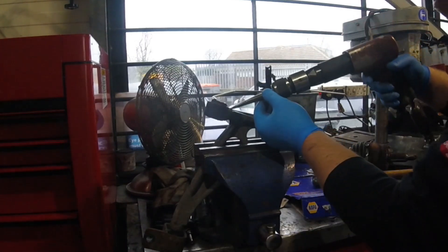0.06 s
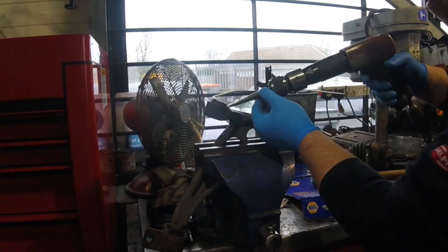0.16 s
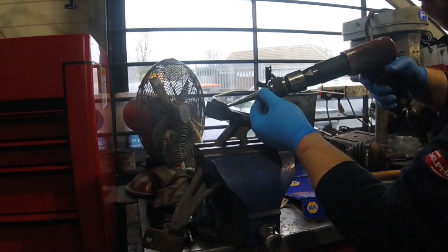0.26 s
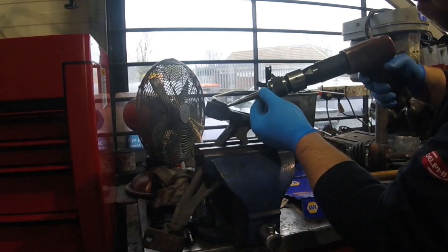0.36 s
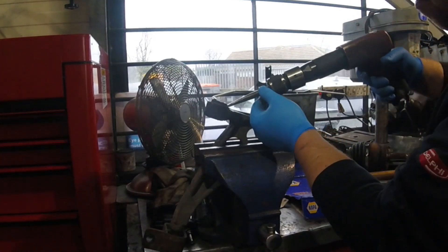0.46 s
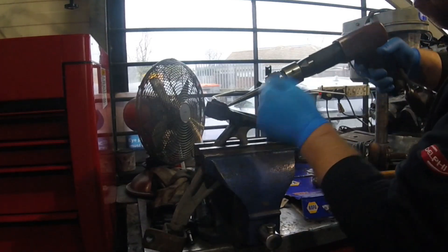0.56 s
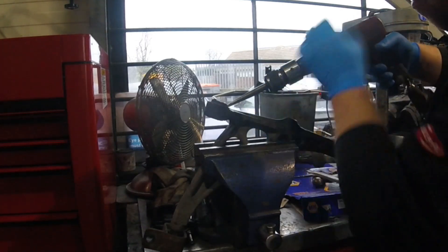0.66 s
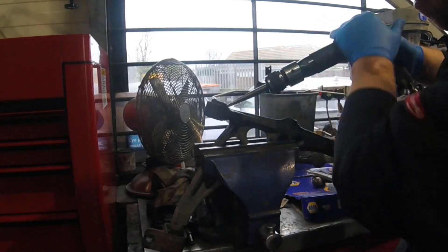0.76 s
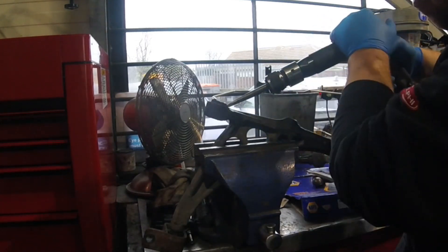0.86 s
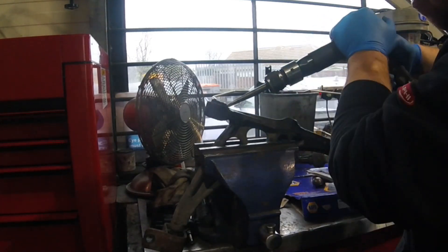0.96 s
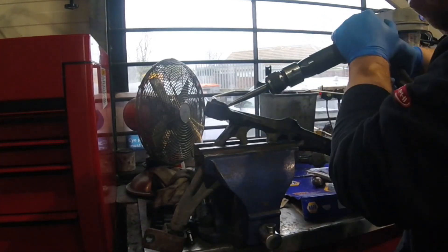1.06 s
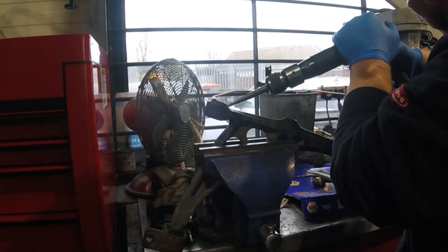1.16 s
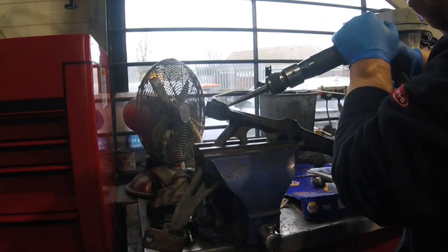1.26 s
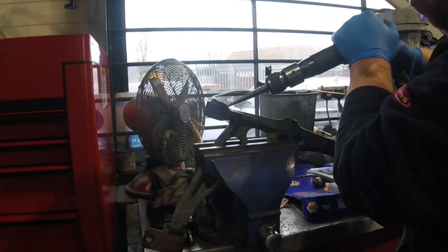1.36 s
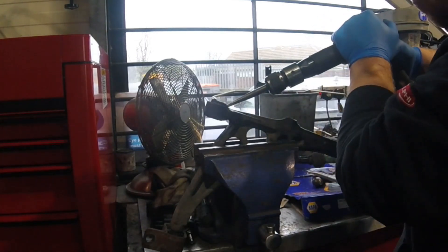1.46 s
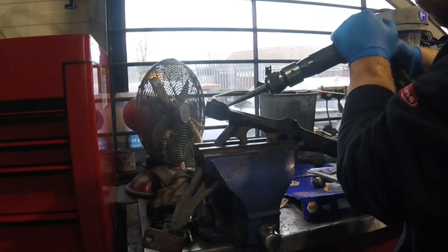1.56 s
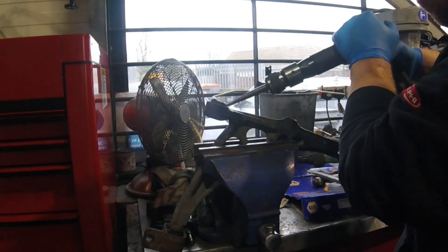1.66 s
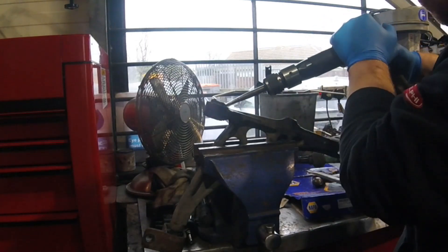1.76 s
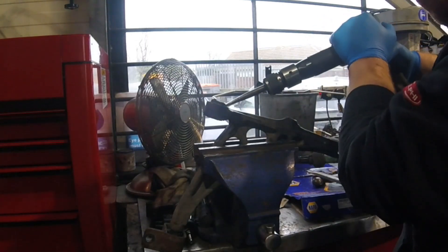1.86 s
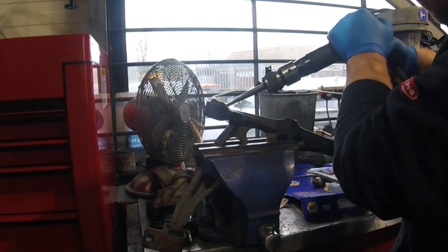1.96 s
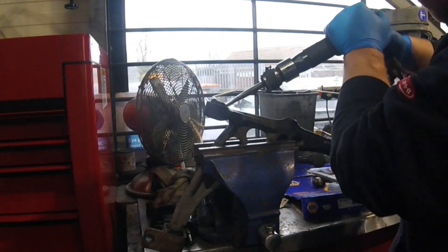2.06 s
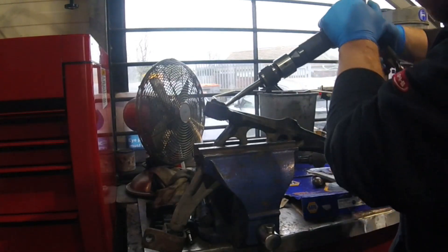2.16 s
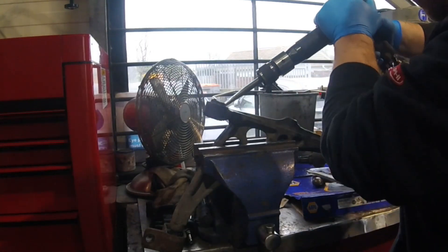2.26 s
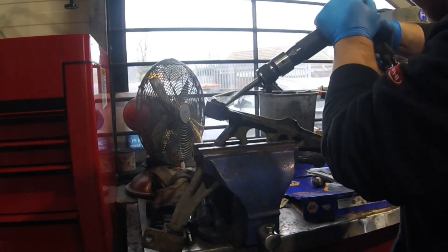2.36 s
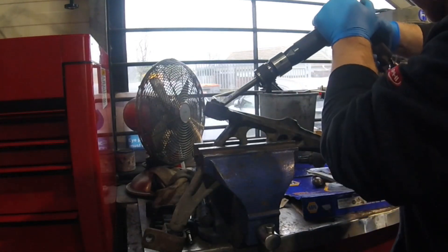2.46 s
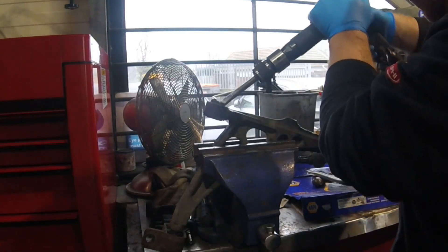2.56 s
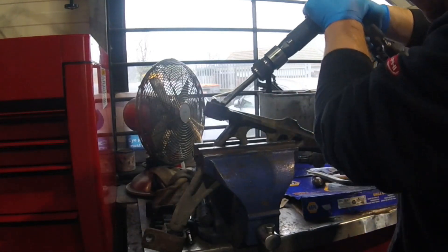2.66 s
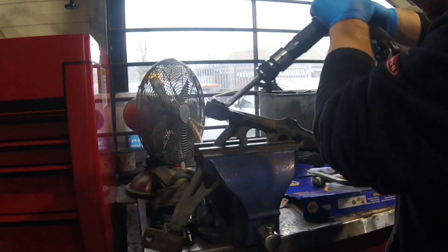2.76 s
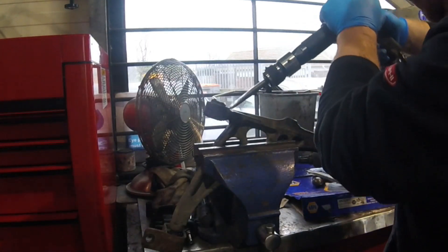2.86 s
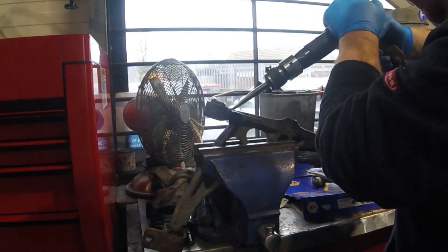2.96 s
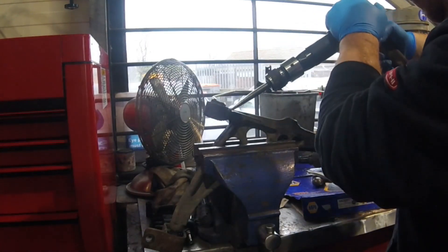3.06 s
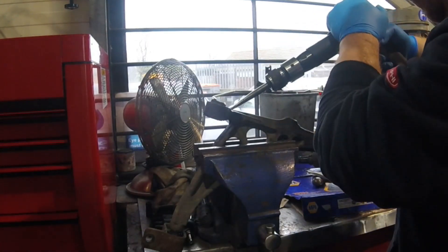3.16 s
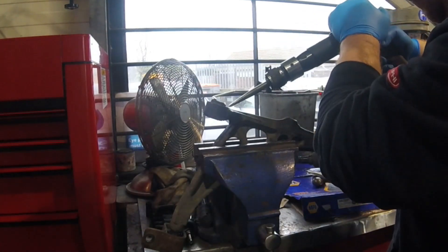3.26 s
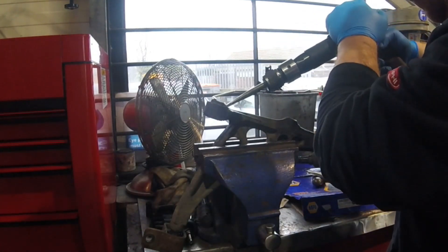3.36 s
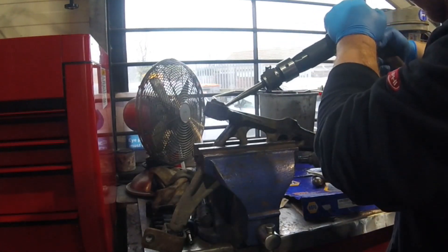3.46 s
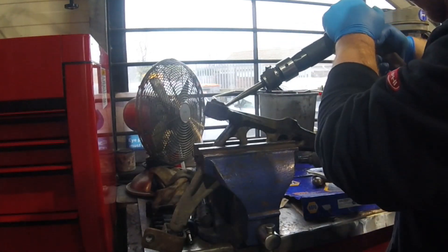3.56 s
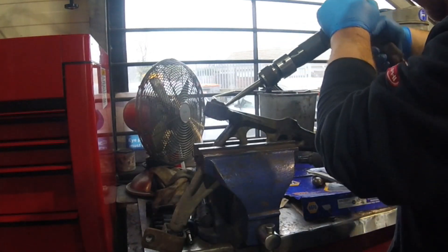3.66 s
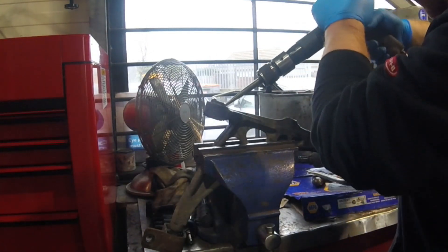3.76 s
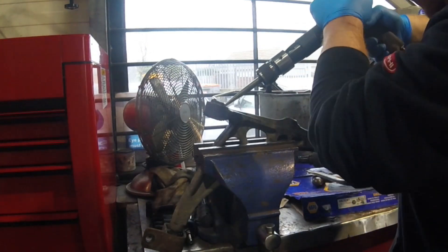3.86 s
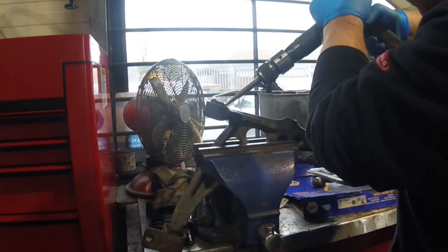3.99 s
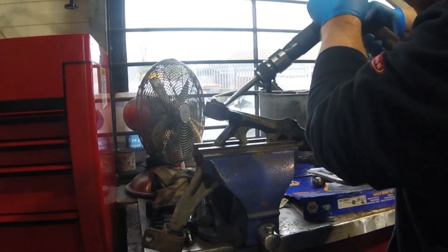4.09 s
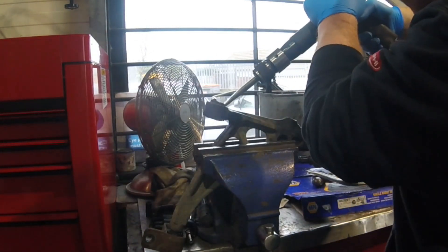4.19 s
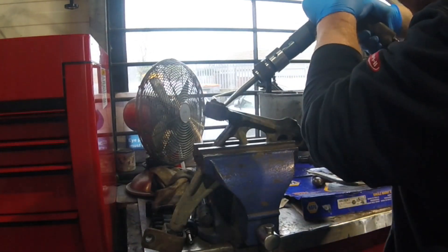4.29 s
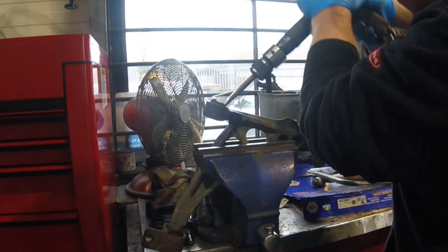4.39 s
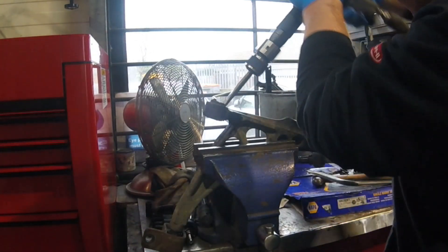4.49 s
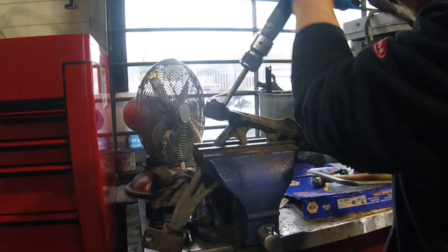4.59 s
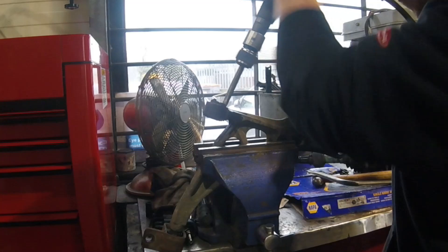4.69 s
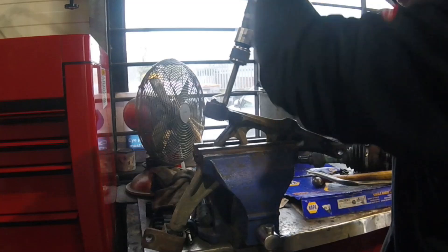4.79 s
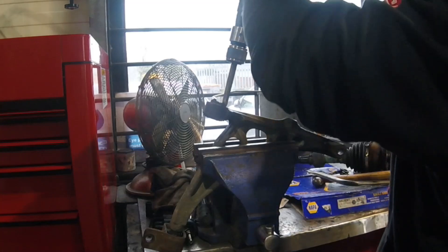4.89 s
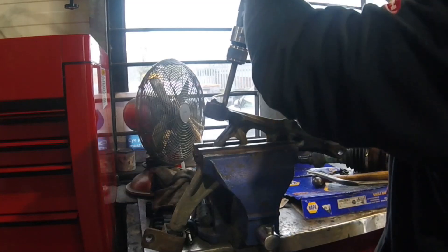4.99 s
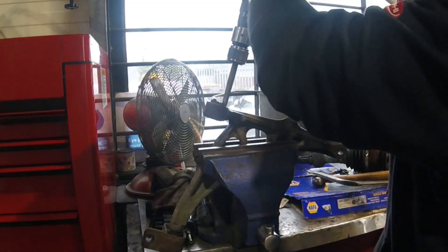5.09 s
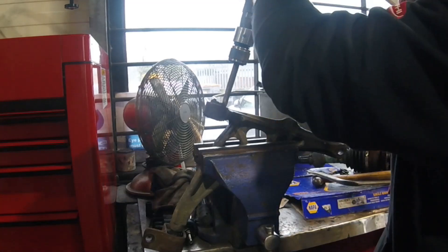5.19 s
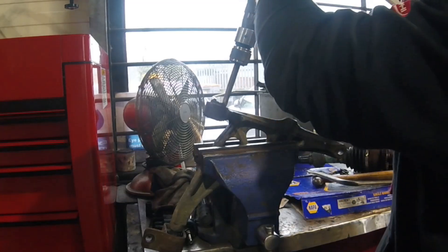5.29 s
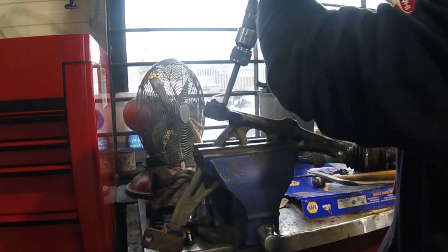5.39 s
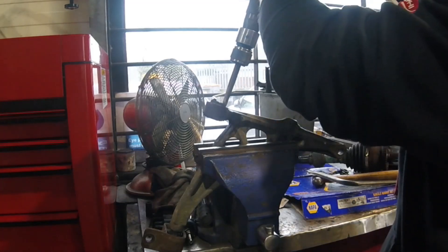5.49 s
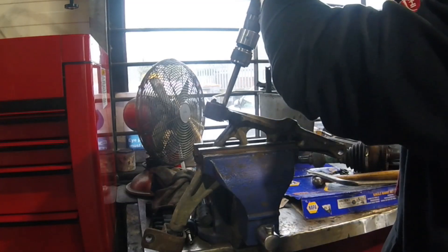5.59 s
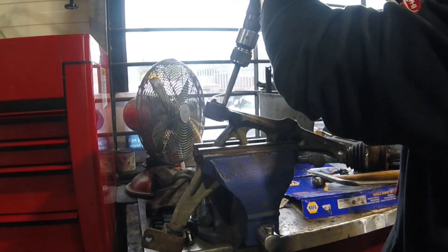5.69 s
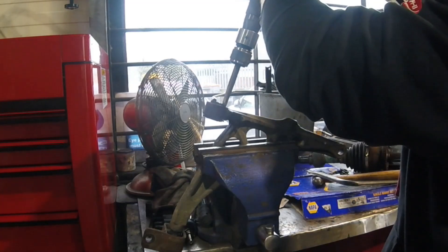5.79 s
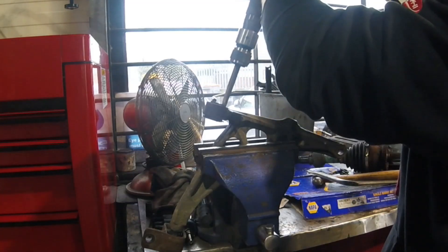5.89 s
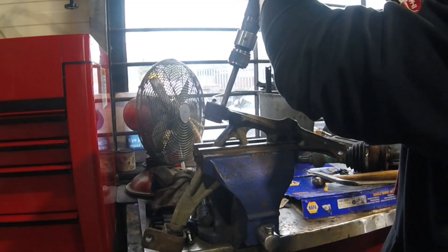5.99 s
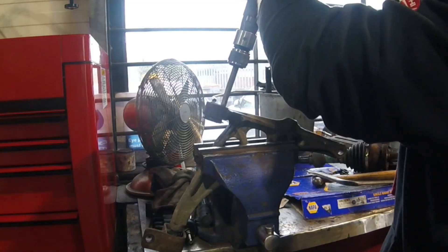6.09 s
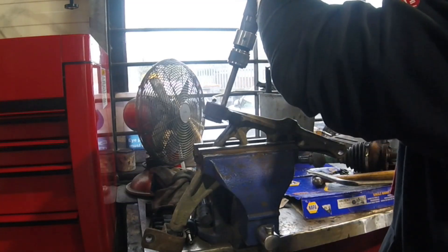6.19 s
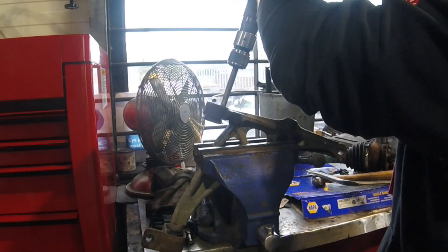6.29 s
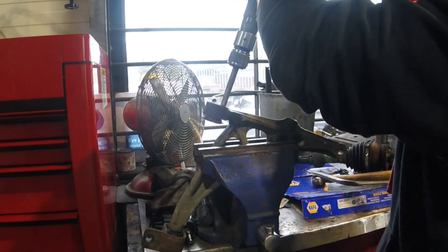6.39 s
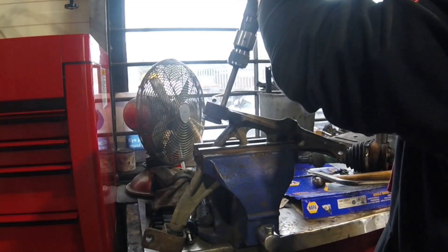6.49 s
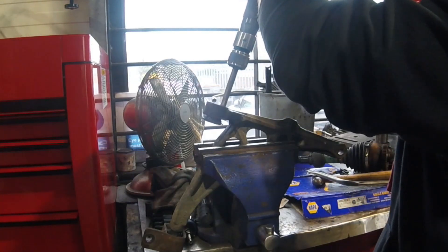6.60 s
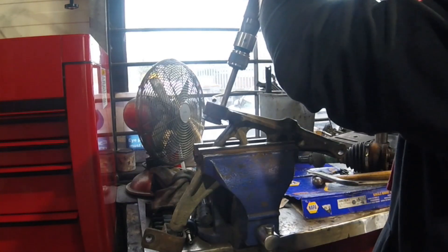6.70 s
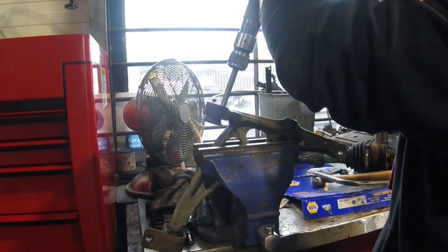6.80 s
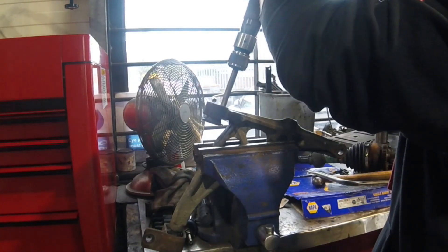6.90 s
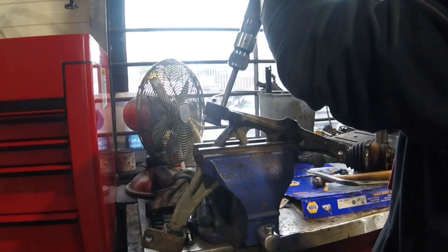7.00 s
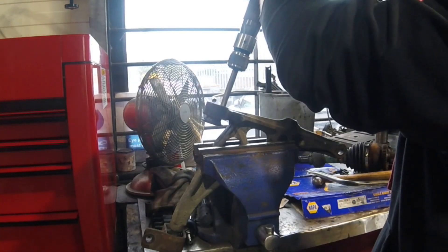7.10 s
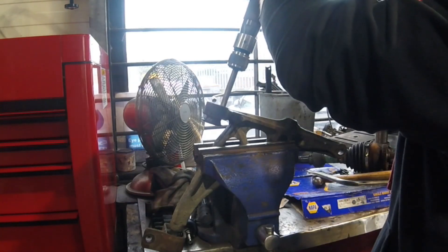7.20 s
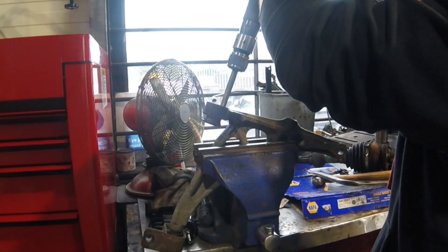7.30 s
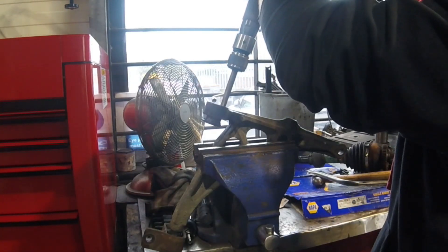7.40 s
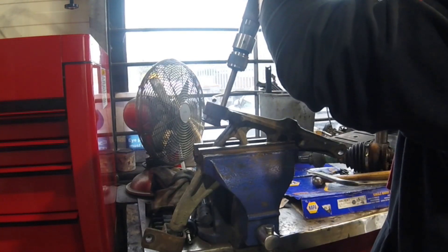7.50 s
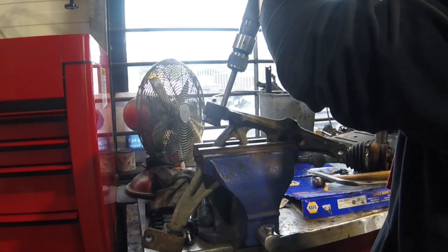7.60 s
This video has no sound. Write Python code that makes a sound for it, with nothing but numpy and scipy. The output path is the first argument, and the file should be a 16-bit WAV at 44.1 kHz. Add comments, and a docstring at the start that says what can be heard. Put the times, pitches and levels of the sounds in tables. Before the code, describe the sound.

An air chisel hammers a clamped steel part in short, loud metallic bursts, ringing through a hard garage with faint air hiss.

```python
"""Air chisel in a garage

An air chisel hammers a steel part clamped in a vise, in short bursts of two to five blows.
Each burst opens with a spit of the valve; each blow is an air pulse plus noise driving steel resonances.
Light late taps mark the loose piston, mostly as it settles; hands knock and tick the tool between bursts.
Filtered noise makes the air leak, rumble and hum; a decaying noise response makes the hard room ring."""
import sys
import numpy as np
from scipy import signal
from scipy.fft import rfft, irfft, next_fast_len
from scipy.io import wavfile
from scipy.ndimage import uniform_filter1d

SR = 44100
rng = np.random.default_rng(int(sys.argv[2]) if len(sys.argv) > 2 else 0)


def unload_wav(signal):
    """Save mono or channel-first audio to the path in sys.argv[1] as 16-bit WAV at rate SR, clipped to [-1, 1]."""
    wavfile.write(
        sys.argv[1],
        SR,
        np.round(np.clip(np.atleast_2d(signal).T, -1, 1) * 32767).astype(np.int16),
    )


N = 337365
T = np.arange(SR // 5) / SR  # time axis of one hit or puff, s

# Pulls of the trigger: [first blow t/s, powered strokes, stroke period/s, valve lead/s, valve level/dB,
# force level/dB, extra clang level/dB, extra ring level/dB, coasting gap/s, coasting blow level/dB]
TRIGGER_PULLS = [(1.480, 1, .033, .029, -34.5, 1, 0, -2.5, .057, 1),
                 (1.717, 3, 0.031, 0.018, -32.5, 1, -0.5, -2, 0.065, -4.5),
                 (2.427, 2, 0.032, 0.043, -28, 1.5, -1, -1.5, 0.065, -6),
                 (4.110, 4, 0.032, .021, -29.5, -1.5, 0, 0.5, 0.051, -4),
                 (5.583, 3, 0.033, .020, -28.5, -2.5, 3, 1.5, 0.068, -2.5),
                 (5.949, 3, 0.032, 0.021, -31, 0.5, 0.5, 0, 0.045, -4.5),
                 (6.290, 2, 0.034, 0.021, -31.5, 0, 1.5, -1, .046, -0.5),
                 (6.543, 2, 0.034, 0.025, -29.5, -0.5, 0, 0.5, 0.041, 1),
                 (6.789, 2, .034, .022, -33.5, -1, -1.5, 3, .046, 1),
                 (7.033, 2, 0.035, 0.024, -31, -0.5, -2, 3, 0.05, -2),
                 (7.285, 3, .033, .023, -31.5, 1, -2.5, 2.5, 0.07, -13),
                 (7.549, 3, .034, 0.028, -37, -4, -0.5, 9, .05, -18)]


def amp(db):
    """Amplitude ratio from a level: 20 dB per factor of ten."""
    return 10 ** (np.asarray(db) / 20)


def unit(x):
    """Normalization to an rms value of 1."""
    return x / np.sqrt(np.mean(x ** 2) + 1e-20)


def along(points, hz):
    """Interpolation of (frequency, value) points on a logarithmic frequency axis."""
    f, v = np.transpose(points)
    return np.interp(np.log(hz + 1), np.log(f + 1), v)


def curves(rows):
    """Linear interpolation in time: one value per sample for each column after the time."""
    s, *columns = np.transpose(rows)
    return [np.interp(np.arange(N) / SR, s, column) for column in columns]


def filtered(x, response):
    """Linear filtering: the spectrum of x times a complex response of frequency."""
    n = x.shape[-1]
    padded = 2 * next_fast_len(n // 2 + 4096)
    spectrum = rfft(x, padded) * response(np.fft.rfftfreq(padded, 1 / SR))
    return irfft(spectrum, padded)[..., :n]


def colour(points):
    """Minimum phase: folding the cepstrum of a magnitude spectrum makes its response causal."""
    def response(hz):
        cepstrum = irfft(np.log(amp(along(points, hz))))
        half = len(cepstrum) // 2
        cepstrum[1:half] *= 2
        cepstrum[half + 1:] = 0
        return np.exp(rfft(cepstrum))
    return response


def body(modes):
    """Modal superposition: damped resonances of alternating sign add up."""
    def response(f):
        return sum((-1) ** k * amp(db) * 1j * f * width / (centre ** 2 - f ** 2 + 1j * f * width)
                   for k, (centre, width, db) in enumerate(modes))
    return response


def struck(modes, count, vary_db):
    """Modal excitation: the tip wanders, so each blow shares its force differently among the modes."""
    gains = amp(vary_db * rng.standard_normal((count, len(modes))))

    def response(f):
        resonances = [(-1) ** k * body([mode])(f) for k, mode in enumerate(modes)]
        return gains @ np.array(resonances)
    return response


def steady(spectrum):
    """Stationary noise: a white source shaped by a spectrum, with rms 1."""
    return unit(filtered(rng.standard_normal(N), colour(spectrum)))


def place(times, sounds):
    """Superposition in time: one short sound laid at each onset."""
    out = np.zeros(N + SR)
    for s, sound in zip(times, sounds):
        out[round(s * SR):][:len(sound)] += sound
    return out[:N]


def chatter(times, levels_db, response, rise, t60, scatter_db, scatter_t60, spiky_db,
            impact=0, lag=0.0038, contact=0.00019):
    """Contact excitation: a swarm of uneven impacts drives a body, peaks after a lag and trails scatter.

    Times are in seconds; levels_db sets the rms of the first 1/45 s of each hit."""
    shape = (len(times), len(T))
    unevenness = unit(uniform_filter1d(rng.standard_normal(shape), size=30))
    contacts = rng.standard_normal(shape) * amp(spiky_db * unevenness)
    onset = 1 - np.exp(-(T / rise) ** 2)
    decay = np.hypot(amp(-60 * T / t60), amp(scatter_db - 60 * T / scatter_t60))
    # a small, varying gap is crossed before the main landing
    landing = lag * np.exp(0.37 * rng.standard_normal((len(times), 1)))
    envelope = onset * decay + impact * np.exp(-((T - landing) / contact) ** 2)
    hits = filtered(contacts * envelope, response)
    early_rms = np.sqrt(np.mean(hits[:, :SR // 45] ** 2, axis=1))
    return place(times, hits * (amp(levels_db) / early_rms)[:, None])


def hum():
    """Narrow-band noise: a machine's low lines, each drifting in strength and phase."""
    # Hum lines, levels before the power law below: [f/Hz, level/dB]
    hum_lines = [(98, -19), (148, -11.5), (195, -6)]
    lines = [(hz, 5, db) for hz, db in hum_lines]  # each 5 Hz wide before the power law
    return unit(filtered(rng.standard_normal(N), lambda hz: np.abs(body(lines)(hz)) ** 1.8))


def background():
    """Amplitude modulation of steady noise: the workshop rumbles and hums, and a low drone swells."""
    # Noise spectrum of the hum's murk: [f/Hz, relative level per Hz/dB]
    murk_spectrum = [(100, -8.5), (150, 1), (195, -1.5), (240, -5), (400, -8.5), (620, -13), (1000, -19.5),
                     (1700, -22), (4000, -33.5), (9000, -58)]
    # Noise spectrum of the rumble: [f/Hz, relative level per Hz/dB]
    rumble_spectrum = [(15, -4.5), (33, -0.5), (48, 3), (75, -7), (100, -5), (130, -27), (300, -44)]
    # Course of the background: [t/s, rumble level/dB, hum reference level/dB]
    workshop_levels = [(0, -49, -47.5), (1.3, -51.5, -49.5), (2.2, -57.5, -57), (3.7, -56.5, -56),
                       (4.8, -58.5, -62), (5.4, -56.5, -59), (7.65, -49.5, -53)]
    # Swells of the drone: [middle t/s, Gaussian half length/s, peak level/dB]
    drone_swells = [(3.6, 0.21, -52.5), (5.496, 0.035, -50.5)]
    drone_spectrum = [(90, -18), (145, 0.0), (195, -7.0), (290, -29), (900, -54)]  # f/Hz, level/dB
    murk_db, lines_db = -2.5, -7  # the hum's noise and its lines, re the hum reference level
    t = np.arange(N) / SR
    rumble_db, hum_db = curves(workshop_levels)
    rumble = amp(rumble_db) * steady(rumble_spectrum)
    humming = amp(hum_db) * (amp(murk_db) * steady(murk_spectrum) + amp(lines_db) * hum())
    swell = sum(amp(db) * np.exp(-((t - s) / half) ** 2 / 2) for s, half, db in drone_swells)
    return rumble + humming + swell * steady(drone_spectrum)


def leak():
    """Jet noise: air seeps steadily from the tool's coupling and hisses louder in spells."""
    # Noise spectrum of the escaping air: [f/Hz, relative level per Hz/dB]
    leak_spectrum = [(1500, -13.5), (4300, -19), (5400, -4.5), (6000, -9), (6800, 3.5), (7600, -6),
                     (8800, -4), (9800, -22), (10600, -37), (12500, -17), (14000, -25)]
    # Spells of louder hiss: [opens t/s, closes t/s, level/dB]
    leak_spells = [(0.029, 1.5, -51), (3.08, 3.6, -61), (3.84, 4.2, -65), (5.0, 5.33, -58)]
    open_s, close_s = 0.15, .2  # length of the linear rise, time constant of the exponential fall
    seep_db = -67.5  # the hiss that always remains
    t = np.arange(N) / SR
    spells = np.zeros(N)
    for opens, closes, db in leak_spells:
        rise = np.clip((t - opens) / open_s + .5, 0, 1)
        fall = np.exp(-np.maximum(t - closes, 0) / close_s)
        spells += amp(db) * rise * fall
    return np.hypot(amp(seep_db), spells) * steady(leak_spectrum)


def handling():
    """Soft and hard contact: hands bump the tool dully while its tip ticks on the part."""
    # Shifts of the grip and tip, ticks before a 5 dB cut: [t/s, knock level/dB, tick level/dB]
    grip_shifts = [(.217, -40, -43.5), (0.243, -44, -45), (.287, -39, -41.5), (0.649, -47, -49),
                   (1.282, -42, -43), (1.348, -58, -47.5), (1.439, -50.5, -54), (2.836, -60.5, -39),
                   (2.872, -60, -46.5), (2.948, -67.5, -52), (2.965, -57, -44.5), (3.479, -56.5, -39),
                   (3.569, -72, -51), (3.705, -60, -71)]
    # Spectrum of the dull knocks: [f/Hz, relative level per Hz/dB]
    knock_spectrum = [(50, -21), (170, -16), (295, 6), (400, -8.5), (600, -1.5), (1000, -17), (1600, -11.5),
                      (3500, -30), (9000, -37)]
    # Spectrum of the steel ticks: [f/Hz, relative level per Hz/dB]
    tick_spectrum = [(1000, -16), (2200, 2.5), (4200, -11), (5300, 10), (6000, 5), (7000, 7.5), (9300, -6),
                     (11000, -30.5), (14000, -20)]
    s, knock_db, tick_db = np.transpose(grip_shifts)
    knocks = chatter(s, knock_db, colour(knock_spectrum), rise=0.0022, t60=0.06, scatter_db=-4,
                     scatter_t60=0.17, spiky_db=0, impact=1.2, lag=0.0042, contact=0.0013)
    ticks = chatter(s, tick_db - 5, colour(tick_spectrum), rise=0.0019, t60=0.024, scatter_db=-10.5,
                    scatter_t60=0.11, spiky_db=0.5, impact=1.6, lag=0.0016)
    return knocks + ticks


def trigger():
    """Valve transient: the snapping valve spits metallic noise shortly ahead of each burst."""
    # Spectrum of the valve's spit: [f/Hz, relative level per Hz/dB]
    valve_spectrum = [(80, -17), (200, 2), (1000, -23), (2200, -11), (3800, -21), (4700, -3.5), (5400, 7),
                      (6200, -5.5), (9000, -5.5), (10500, -15.5), (14000, -23)]
    openings = [(start - lead, valve_db) for start, strokes, period, lead, valve_db, *rest in TRIGGER_PULLS]
    s, db = np.transpose(openings)
    return chatter(s, db, colour(valve_spectrum), rise=0.0027, t60=0.055, scatter_db=-10,
                   scatter_t60=0.35, spiky_db=2.5, impact=0.45, lag=.002)


def blows():
    """Reciprocating motion: strokes repeat under power, then the piston coasts into a late, duller blow.

    Gives the time and the exhaust, clang, ring and clash levels of every blow."""
    # Light taps of the loose piston: [t/s, force level/dB]
    piston_taps = [(2.404, -11.5), (4.358, -17), (5.82, -18.5), (6.142, -10), (6.462, -15.5),
                   (6.703, -15.5), (6.962, -19.5), (7.422, -15)]
    tap_clang_db = 1.5  # a light tap rings the part more than the chisel
    # base levels: exhaust, part, chisel, bright clash
    base_puff_db, base_clang_db, base_ring_db, base_clash_db = -27, -24.5, -21.5, -21.5
    first_stroke_db = -1  # the piston starts from rest
    spent_air_db = -9.5  # little exhaust is left once the valve has shut
    coast_clang_db, coast_ring_db, coast_clash_db = -0.15, -1.3, -3  # an unpowered blow is duller
    # the tool is held slanted at first, then upright, and its exhaust comes through more strongly
    upright_s, slant_puff_db, upright_puff_db = 5.0, -1.5, -0.17
    rows = [(s, force_db, tap_clang_db, 0, True) for s, force_db in piston_taps]
    for start, strokes, period, lead, valve_db, force_db, clang_db, ring_db, gap, coast_db in TRIGGER_PULLS:
        beats = start + period * np.arange(round(strokes))
        rows += [(s, force_db + first_stroke_db * (s == start), clang_db, ring_db, False) for s in beats]
        rows += [(beats[-1] + gap, force_db + coast_db, clang_db, ring_db, True)]
    s, db, clang_db, ring_db, coasting = np.transpose(rows)
    # the seat of the tip trades the part's clang against the chisel's ring, blow by blow
    seat_db = 1.03 * rng.standard_normal(len(s))
    aim_db = np.where(s < upright_s, slant_puff_db, upright_puff_db)
    return (s, db + base_puff_db + aim_db + spent_air_db * coasting,
            db + base_clang_db + clang_db + seat_db + coast_clang_db * coasting,
            db + base_ring_db + ring_db - seat_db / 2 + coast_ring_db * coasting,
            db + base_clash_db + coast_clash_db * coasting)


def hammering(s, puff_db, clang_db, ring_db, clash_db):
    """Impact excitation of modes: blows ring the part, shank and tool, and the vise and bench clatter."""
    # Resonances of the clamped part: [f/Hz, width/Hz, relative level/dB]
    part_modes = [(862, 16, -6), (960, 29, -6.5), (1187, 53, -5.5), (1314, 51, -1.5), (1445, 20.4, 2.5),
                  (1555, 63, 2.5), (1816, 630, -4), (2355, 160, -1), (2610, 128, -2), (3446, 274, -5.5),
                  (3996, 160, -9)]
    # Resonances of the chisel shank: [f/Hz, width/Hz, relative level/dB]
    shank_modes = [(4976, 270, -2), (5300, 240, 3.5), (5595, 235, 1.5)]
    # Resonances of the tool's steel: [f/Hz, width/Hz, relative level/dB]
    steel_modes = [(6414, 240, 1.5), (6840, 710, -2), (7690, 1390, -7.5), (8280, 290, -8), (8930, 365, -8)]
    # Spectrum of the vise and bench clatter: [f/Hz, relative level per Hz/dB]
    clatter_spectrum = [(60, -21), (170, 4), (280, -3.5), (700, -2), (1000, -10.5), (3000, -8), (4300, -9),
                        (7000, -12), (9500, -8), (10500, -49), (12500, -51), (14000, -50.5)]
    part = chatter(s, clang_db - 1.5, struck(part_modes, len(s), vary_db=3), rise=0.0003, t60=0.021,
                   scatter_db=2.0, scatter_t60=0.082, spiky_db=5.5, impact=1.4, lag=0.0019)
    shank = chatter(s, ring_db, struck(shank_modes, len(s), vary_db=0.2), rise=0.00073, t60=0.052,
                    scatter_db=-28, scatter_t60=0.12, spiky_db=2.5, impact=0.6, lag=0.0029)
    clash = chatter(s, clash_db - .8, struck(steel_modes, len(s), vary_db=1.5), rise=0.00046, t60=0.074,
                    scatter_db=-23, scatter_t60=0.089, spiky_db=-2.5, impact=0.78, lag=0.0025)
    clatter_db = (puff_db + clang_db) / 2 - 0.6
    clatter = chatter(s, clatter_db, colour(clatter_spectrum), rise=0.00088, t60=.05,
                      scatter_db=-3, scatter_t60=0.099, spiky_db=6.5, impact=0.85, lag=0.0018)
    return part + shank + clash + clatter


def exhaust(s, puff_db, width, gain_db):
    """Pulsed volume flow: a push of air, then a longer suction, reflected by the nearest surfaces."""
    # Echoes from bench, cabinet and window: [delay/s, gain as a signed ratio]
    reflections = [(.0042, -0.018), (.0048, 0.049), (.0064, -0.06), (.0069, 0.013), (0.0125, 0.12),
                   (0.0125, -.14), (.0164, 0.099), (0.0181, -0.096)]
    u = T / width
    puff = u * (2 - u) * np.exp(-u)
    echoes = sum(gain * np.interp(T - delay, T, puff, left=0) for delay, gain in reflections)
    return place(s, amp(puff_db + gain_db)[:, None] * (puff + echoes))


def garage(x, build, early_db, early_t60):
    """Reverberation: near walls die quickly, the hall behind slowly, at a rate that varies with frequency."""
    # Late decay of the room: [f/Hz, t60/s]
    room_decay = [(100, 2), (300, 1.53), (1200, 2.29), (2600, 2.72), (5300, 1.65), (9000, 0.97), (14000, 1)]
    # Spectrum of the room's echo: [f/Hz, relative level/dB]
    echo_spectrum = [(50, -6.5), (150, -3.5), (260, -2), (620, 4), (900, 1), (1180, 5.5), (1600, -5),
                     (2600, -4.5), (4300, -6.5), (5250, -7), (6500, -2), (9000, -4), (12000, -35)]
    hz, t, noise = signal.stft(rng.standard_normal(2 * SR), SR, nperseg=256)
    late = amp(-60 * t / along(room_decay, hz)[:, None])
    early = amp(early_db - 60 * t / early_t60)
    envelope = np.hypot(late, early) * (1 - np.exp(-t / build))
    tail = signal.istft(noise * envelope, SR, nperseg=256)[1]
    reverberant = signal.fftconvolve(x, tail / np.linalg.norm(tail))[:N]
    return filtered(reverberant, colour(echo_spectrum))


def singing(x):
    """Sympathetic resonance: lightly damped steel picks up the blows and rings on."""
    # Resonances of loose steel on the bench: [f/Hz, width/Hz, relative level/dB]
    loose_steel = [(1170, 4.9, 3), (1195, 3.2, -1), (2545, 4.4, 0), (6360, 3.3, 3)]
    return filtered(np.pad(x, (0, 2 * SR)), body(loose_steel))[:N]


def scene():
    """Superposition of direct and reverberant sound: the tool close by, in its room."""
    s, puff_db, *steel_db = blows()
    steel = hammering(s, puff_db, *steel_db)
    air = exhaust(s, puff_db, width=0.00048, gain_db=21.0)
    tool = steel + air + trigger() + handling()
    room = amp(-6.0) * garage(tool, build=0.0072, early_db=9, early_t60=0.31)
    return (tool + room + amp(0.5) * singing(tool) + leak() + background())[None]


def record(dry):
    """Saturation and band limiting: peaks are rounded, the top octave dulled and the highest treble cut."""
    # Treble response: [f/Hz, level/dB]
    treble_response = [(8800, 0), (9500, 4), (10250, -2.5), (11200, -3), (12500, -5), (13300, -24),
                       (14200, -28)]
    ceiling, top_hz = .84, 14200  # limit of the amplitude, limit of the band in Hz
    rounded = dry / (1 + np.abs(dry / ceiling) ** 4) ** (1 / 4)
    dulled = filtered(rounded, colour(treble_response))
    return filtered(dulled, lambda hz: hz < top_hz)


dry = scene()
out = record(dry)
unload_wav(out)
```